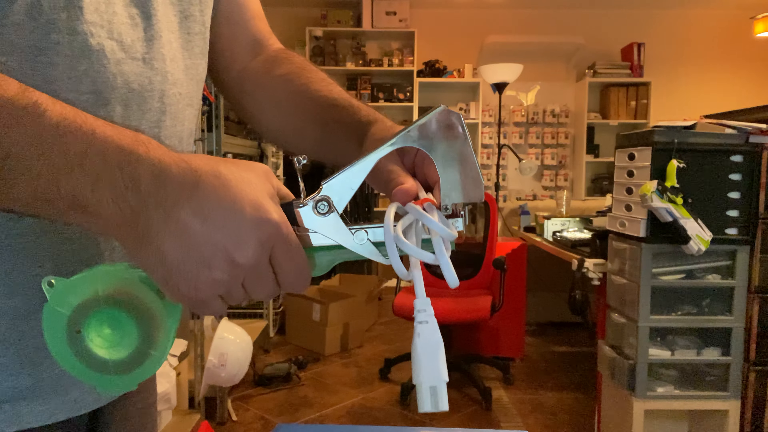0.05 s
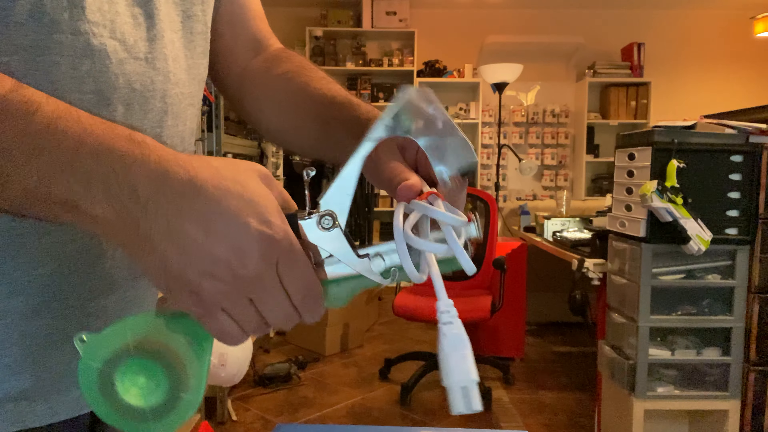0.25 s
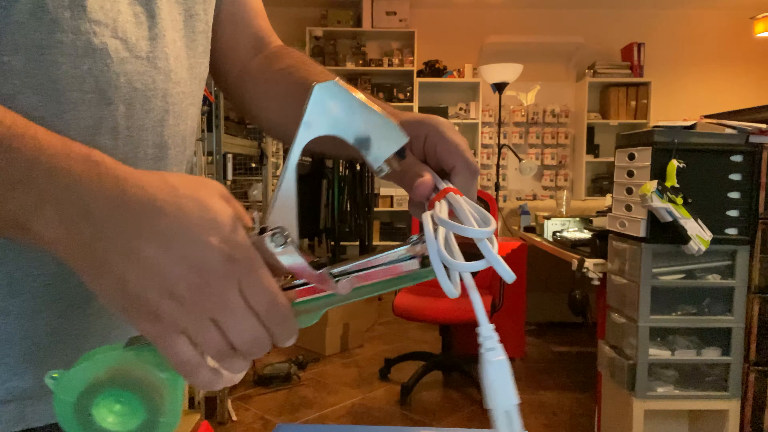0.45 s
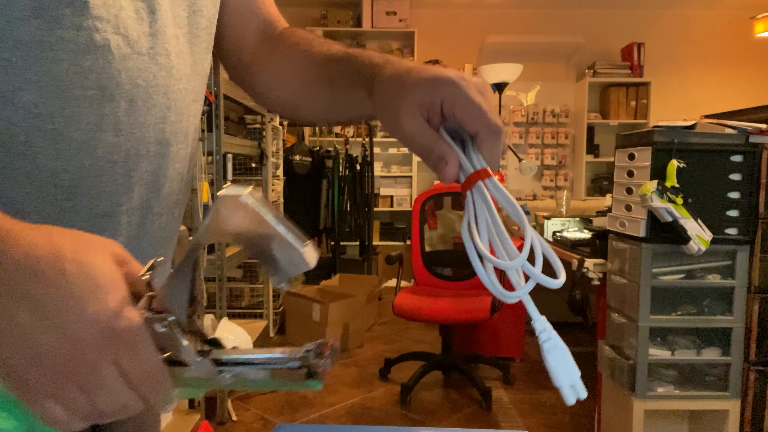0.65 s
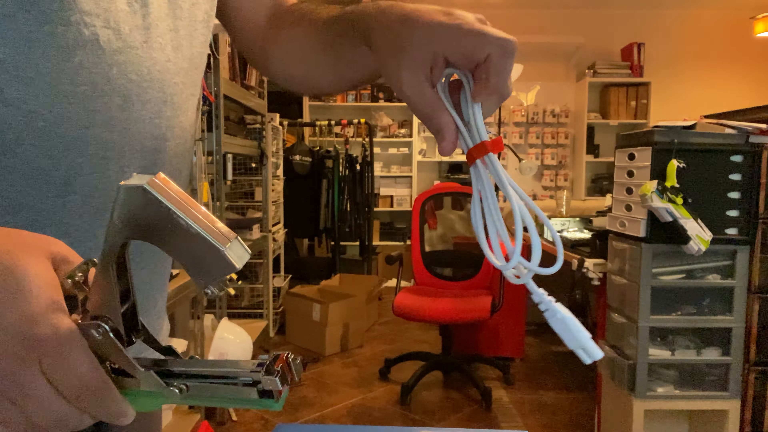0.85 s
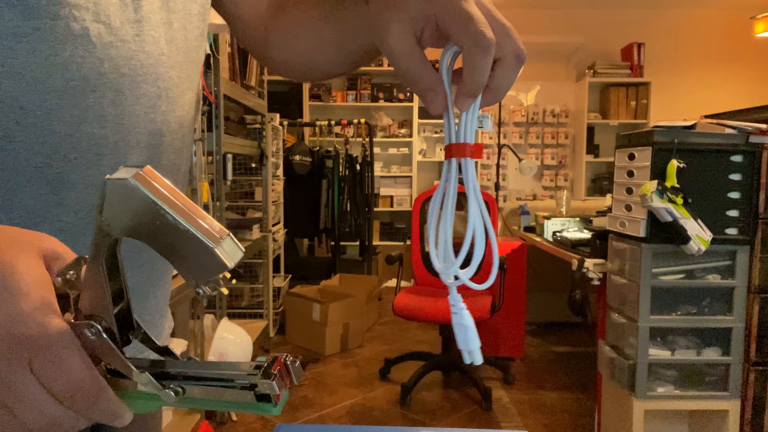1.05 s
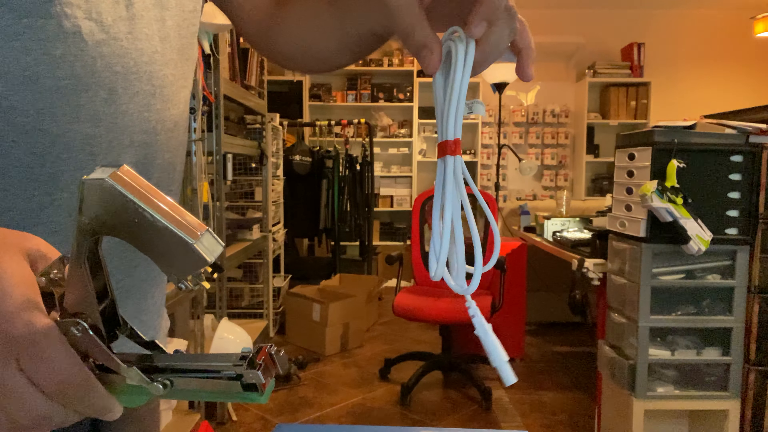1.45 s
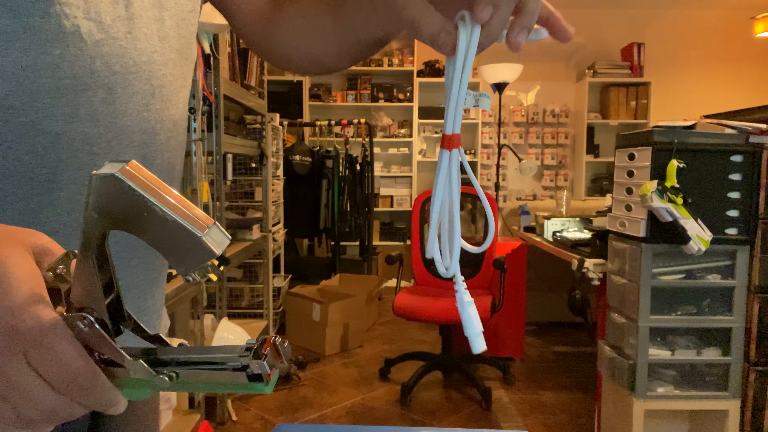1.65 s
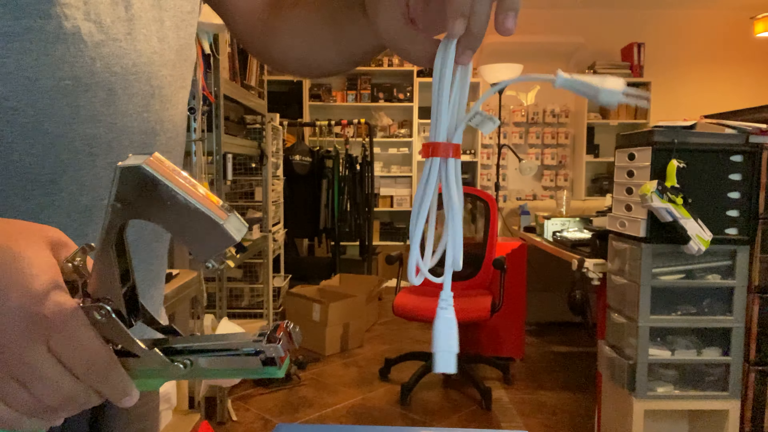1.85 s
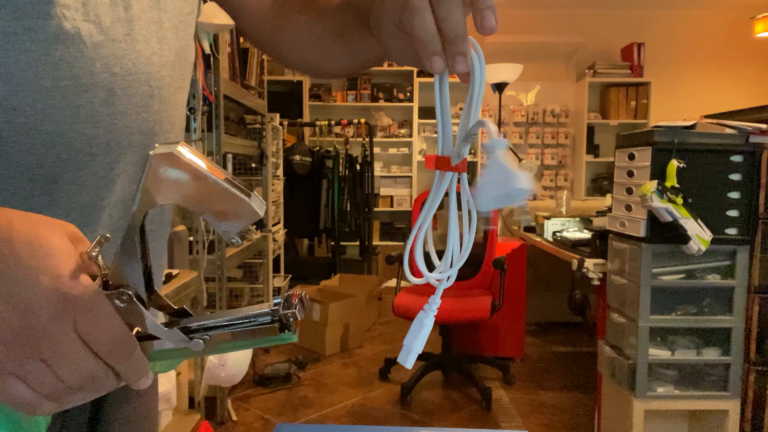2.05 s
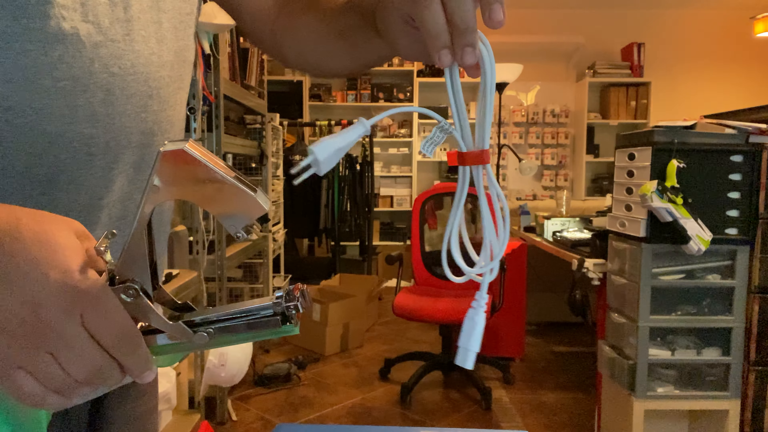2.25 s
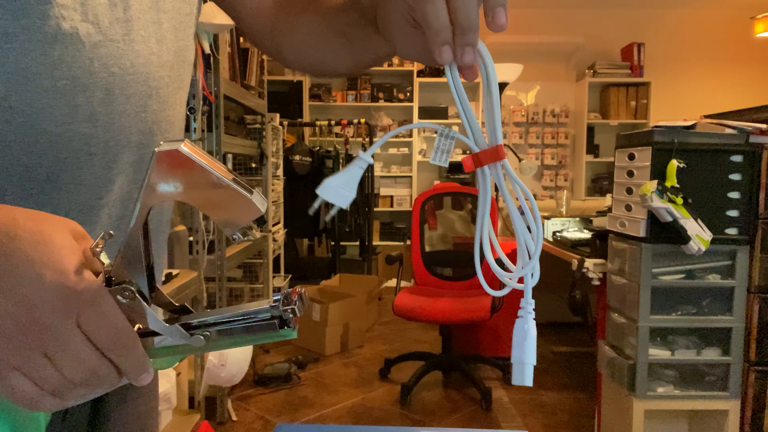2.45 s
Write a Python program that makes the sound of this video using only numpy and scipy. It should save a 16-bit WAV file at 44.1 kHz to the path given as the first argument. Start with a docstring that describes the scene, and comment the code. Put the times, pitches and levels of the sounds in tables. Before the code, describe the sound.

A handheld steel tying tool snaps shut close by, with a loud, sharp double clack at about 0.2 to 0.3 seconds, a brief metallic ring and a dull handle thud. Its loose jaw knocks softly from 0.5 to 0.8 seconds. From 1 to 2.2 seconds, a handled cable gives faint ticks and short hissy slides. A low ventilation hum continues throughout, in a workshop with short reverberation.

```python
"""Soft knocks over a low ventilation hum: a handheld steel tying tool is moved close to the microphone.
Squeezed shut on a coiled cable, it snaps twice, staple then tape cutter; each impact excites the
damped modes of its sheet steel, jaw and plastic handle, and the handles bump against their stop.
The loose jaw knocks as it springs open, then the cable ticks and slides with friction in the hand.
The cluttered workshop adds a short reverberation."""
import sys
import numpy as np
from scipy import signal
from scipy.fft import rfft, irfft, next_fast_len
from scipy.io import wavfile
from scipy.ndimage import map_coordinates

SR = 44100
rng = np.random.default_rng(int(sys.argv[2]) if len(sys.argv) > 2 else 0)


def store_wav(level_fs):
    """Save 16-bit WAV to argv[1]."""
    pcm = np.round(np.clip(np.atleast_2d(level_fs), -1, 1) * 32767)
    wavfile.write(sys.argv[1], SR, pcm.T.astype(np.int16))


N = 110250
ATTACK_S, BODY_ATTACK_S = 0.00038, 0.00055


def amp(db):
    """Amplitude ratio of a level in decibels."""
    return 10 ** (np.asarray(db) / 20)


def unit_rms(x):
    """Normalisation to unit mean power."""
    return x / np.sqrt(np.mean(x ** 2) + 1e-20)


def along(points, hz):
    """Interpolation of (frequency [Hz], value) points on a logarithmic frequency axis."""
    freqs, values = np.transpose(points)
    return np.interp(np.log(hz + 1), np.log(freqs + 1), values)


def filtered(x, response):
    """Linear filtering: the spectrum is multiplied by a frequency response."""
    n = x.shape[-1]
    size = next_fast_len(n + 8192)
    return irfft(rfft(x, size) * response(np.fft.rfftfreq(size, 1 / SR)), size)[..., :n]


def high_pass(x, hz):
    """Second-order attenuation below a cutoff."""
    return signal.sosfilt(signal.butter(2, min(hz, SR / 3), "high", fs=SR, output="sos"), x)


def wobble(knots_per_s):
    """Smooth random modulation."""
    return map_coordinates(rng.standard_normal(N // 20), [np.arange(N) * knots_per_s / SR], mode="wrap")


def add(track, start_s, sound):
    """Superposition of a sound on the track."""
    i = max(0, round(start_s * SR))
    track[:, i:i + sound.shape[-1]] += sound[..., :N - i]


def noise(spectrum, coherence, n):
    """Partial coherence: independent noises, added and subtracted, make a stereo pair."""
    def response(hz):
        angle = np.arccos(np.clip(along(coherence, hz), -1, 1)) / 2
        return amp(along(spectrum, hz)) * [np.cos(angle), np.sin(angle)]
    mid, side = filtered(rng.standard_normal((2, n)), response)
    return unit_rms(np.array([mid + side, mid - side]))


def mode(hz, t60, attack_s):
    """Damped oscillation: a struck resonance falls 60 dB in t60 seconds."""
    t = np.arange(SR // 4) / SR
    return np.sin(2 * np.pi * hz * t) * np.exp(-np.log(1000) * t / t60) * (1 - np.exp(-t / attack_s))


# Left port's excess for a near source (frequency [Hz], level [dB])
NEAR_PAN = [(100, 1), (350, 2.5), (750, 6), (1500, 3), (3000, 0.3), (5500, -2.5), (13000, 0)]
# Left port's lead for a near source (frequency [Hz], phase [rad])
NEAR_LEAD = [(150, .05), (350, 1), (750, 1.6), (1500, 2.9), (3000, 2.3), (4500, 1.4), (6200, 0)]
def ports(hz):
    """Level and phase differences: a near source reaches the two microphone ports unequally."""
    half = np.array([[.5], [-.5]])
    return amp(half * along(NEAR_PAN, hz)) * np.exp(1j * half * along(NEAR_LEAD, hz))


# Near sound at the two ports (frequency [Hz], coherence [0 to 1])
NEAR_COHERENCE = [(150, .7), (700, .9), (1500, .7), (3000, .65), (5500, .5), (8000, .85), (10000, .96)]
def contact(spectrum, t60, attack_s):
    """Modal overlap: the dense resonances of one impact merge into decaying noise."""
    t = np.arange(SR // 4) / SR
    envelope = amp(-60 * t / t60) * (1 - np.exp(-t / attack_s))
    burst = filtered(noise(spectrum, NEAR_COHERENCE, len(t)), ports) * envelope
    return unit_rms(burst) * np.sqrt(np.mean(envelope ** 2))


# Ventilation noise (frequency [Hz], relative level [dB])
RUMBLE_SPECTRUM = [(15, -34), (25, -13), (64, -5), (161, -6.5), (384, -19), (641, -16), (775, -21.5),
                   (936, -18.5), (1100, -26), (1190, -21.5), (1790, -31), (2690, -29.5), (3820, -44),
                   (8360, -47.5), (13500, -50), (16000, -58)]
# That noise at the two ports (frequency [Hz], coherence [0 to 1])
RUMBLE_COHERENCE = [(60, 0.9), (200, 0.75), (400, .45), (900, .05), (6000, 0.1), (10000, .9)]
# Hum tones (frequency [Hz], level [dB])
HUM_TONES = [(64.6, -69.5), (157, -72.5), (274.5, -73.5), (328.4, -81)]
def ventilation(rumble_db=-59.5):
    """Line and continuous spectra: tones wavering in phase stand over a broadband rumble."""
    t = np.arange(N) / SR
    hum = sum(amp(db) * np.sqrt(2) * np.sin(2 * np.pi * hz * t + 0.63 * wobble(18))
              for hz, db in HUM_TONES)
    return amp(rumble_db) * noise(RUMBLE_SPECTRUM, RUMBLE_COHERENCE, N) + hum


# Knocks and scuffs of the jaw; the first row is a blow struck just before, still dying away as the scene opens
# (time [s], level [dB], T60 [s])
KNOCKS = [(0.0, -44.5, 0.16), (0.132, -54.5, 0.2), (0.476, -43, 0.085), (0.631, -47, 0.061),
          (0.644, -46.5, 0.066), (0.675, -45.5, 0.031), (0.76, -58, 0.18), (0.803, -55.5, 0.047)]
# One knock (frequency [Hz], relative level [dB])
KNOCK_SPECTRUM = [(100, -19), (400, -12), (680, -0.5), (1050, -9), (1370, 4.5), (1700, -6), (2400, -4.5),
                  (3500, -17), (7000, -30), (15000, -45)]
def loose_jaw():
    """Soft impact: the loose jaw knocks with a blunt onset and little treble."""
    out = np.zeros((2, N))
    for start, db, t60 in KNOCKS:
        add(out, start, amp(db) * contact(KNOCK_SPECTRUM, t60, attack_s=0.0022))
    return out


# Ticks of cable and tape (time [s], level [dB], T60 [s], low cutoff [Hz])
TICKS = [(0.083, -66, 0.035, 8000), (0.133, -61, 0.04, 2000), (0.52, -61.5, 0.04, 3960),
         (1.0985, -52, 0.035, 1400), (1.104, -46, 0.017, 1610), (1.163, -51.5, 0.015, 7100),
         (1.366, -58, 0.032, 2507), (1.597, -67.5, 0.07, 5000)]
# One tick (frequency [Hz], relative level [dB])
TICK_SPECTRUM = [(500, -11), (1500, 2.5), (3300, -2), (5000, -9), (8200, 1), (10000, -6), (13000, -4),
                 (16000, -13)]
def cable_ticks():
    """Light impact: brief contacts sound only in the treble, with a faint ring."""
    out = np.zeros((2, N))
    ring = amp(-20) * mode(hz=2630, t60=.12, attack_s=ATTACK_S)
    for start, db, t60, cutoff_hz in TICKS:
        tick = contact(TICK_SPECTRUM, t60, ATTACK_S) + ring
        add(out, start, amp(db) * high_pass(tick, cutoff_hz))
    return out


# Cracks of the staple and the tape cutter (frequency [Hz], relative level [dB])
STAPLE_SPECTRUM = [(100, -50), (400, -29), (1200, -12.5), (2200, -1.5), (3000, -3.5), (3900, 6.5),
                   (5000, -4.5), (6500, -1.5), (9000, -7), (11200, -7.5), (12300, 2.5), (13500, -9),
                   (16000, -13.5)]
CUTTER_SPECTRUM = [(300, -29.5), (1200, -9), (2400, 0.5), (3500, -0.5), (5500, -3), (7500, -0.5),
                   (9000, -7), (12500, -6), (16000, -13)]
def crack(cutter_share, t60):
    """Hard impact: a sudden force has a broad spectrum, here a blend of staple and cutter."""
    hz = np.geomspace(200, 16000, num=128)
    db = (1 - cutter_share) * along(STAPLE_SPECTRUM, hz) + cutter_share * along(CUTTER_SPECTRUM, hz)
    return high_pass(contact(np.transpose([hz, db]), t60, ATTACK_S), hz=600)


# Modes of the plastic handle (frequency [Hz], level [dB], T60 [s])
HANDLE_MODES = [(160, -19, .09), (238, -18.5, 0.089), (429, -11, .025), (580, -4, .025), (713, -0.5, .028),
                (1090, -2, 0.032)]
def handle_thud():
    """Heavy damping: the plastic's low modes die quickly into a dull thud."""
    modes = sum(amp(db) * mode(hz, t60, BODY_ATTACK_S) for hz, db, t60 in HANDLE_MODES)
    return high_pass(filtered(modes, ports), hz=175)


# Modes of the steel jaw (frequency [Hz], level from staple [dB], level from cutter [dB], T60 [s])
JAW_MODES = [(646, -17, -14, .14), (720, -14, -5, .15), (1048, -14, -5, .16), (1125, -11, -2, .14),
             (1220, -6, -3, .11), (1345, -7, -5, .19), (1470, 0, -7, .09), (1530, -5, -3, .14),
             (1997, -12, -6, .15), (2438, -10, 4, .12), (2900, -3, -9, .07), (3988, 1, -8, .08),
             (5565, -16, -8, .11), (6262, -8, -13, .11), (6545, -12, -14, .12), (7148, -14, -12, .15),
             (12410, -4, -14, .07)]
def jaw_ring(cutter_share):
    """Modal excitation: staple and cutter drive the same modes in different measure."""
    t = np.arange(SR // 4) / SR
    hz, staple_db, cutter_db, t60 = np.transpose(JAW_MODES)
    strength = amp((1 - cutter_share) * staple_db + cutter_share * cutter_db)
    strike = strength * np.exp(2j * np.pi * rng.random(len(hz)))
    modes = np.exp((2j * np.pi * hz - np.log(1000) / t60)[:, None] * t)
    return ((ports(hz) * strike) @ modes).real * (1 - np.exp(-t / ATTACK_S))


# Impacts in the tool
# (time [s], crack level [dB], crack T60 [s], cutter share [0 to 1], steel level [dB], thud level [dB])
BLOWS = [(0.186, -39, 0.02, 0, -56, -76), (0.1966, -36, 0.11, 0.07, -45, -62),
         (0.2046, -1.5, 0.0081, 0.06, -25, -44), (0.2057, -15.5, .022, 0.03, -21.5, -42),
         (0.209, -12.5, .026, 0.15, -16.5, -39), (0.235, -42, 0.05, 0.3, -45, -34.5),
         (0.2553, -23, 0.05, 0.8, -44, -48), (0.2598, -10, .03, 0.88, -16.5, -24.5),
         (0.2648, -16, .036, 0.73, -16.5, -32), (0.2714, -32, .035, 0.7, -16, -27),
         (0.2974, -27.5, 0.044, 0.6, -32, -20.5), (0.312, -34.5, 0.028, 1, -34, -38.5)]
# Clank of the sheet steel (frequency [Hz], relative level [dB])
CLANK_SPECTRUM = [(200, -36), (600, -21), (950, -20.5), (1120, -5), (1480, 1), (1800, -7), (2500, -9.5),
                  (4000, -22.5), (9000, -42.5)]
def tool_snaps(ring_db=-14.5):
    """Impulse excitation: each blow cracks, sets handle and steel vibrating and sounds the room."""
    out = np.zeros((2, N))
    thud = handle_thud()
    for start, crack_db, t60, cutter_share, steel_db, thud_db in BLOWS:
        blow = amp(crack_db) * crack(cutter_share, t60) + amp(thud_db) * thud
        clank = contact(CLANK_SPECTRUM, t60=0.039, attack_s=BODY_ATTACK_S)
        steel = amp(steel_db) * (clank + amp(ring_db) * jaw_ring(cutter_share))
        add(out, start, workshop(blow + steel))
    return out


# The handles hit their stop (time [s], level [dB])
BUMPS = [(0.276, -43), (0.289, -44), (0.325, -49)]
def handle_bumps():
    """Free vibration: each hit on the stop excites one low mode."""
    out = np.zeros((2, N))
    for start, db in BUMPS:
        add(out, start, amp(db) * mode(hz=82.5, t60=.12, attack_s=.008))
    return out


# Slides of the cable
# (centre time [s], half width [s], level [dB], low edge [Hz], slope above the edge [dB/octave])
SLIDES = [(0.99, .045, -73.5, 10040, -1), (1.023, .018, -73, 2804, -7), (1.377, 0.018, -67.5, 7400, -15),
          (1.745, .025, -80, 7000, -2), (2.138, 0.014, -68, 7000, 2), (2.167, .016, -64, 6400, 3)]
def cable_slides(roughness_db=2.5):
    """Sliding friction: cable drawn through the fingers gives short swells of grainy hiss."""
    out, t = np.zeros((2, N)), np.arange(N) / SR
    grip = unit_rms(amp(roughness_db * wobble(210)))
    for centre, half_width, db, edge_hz, slope in SLIDES:
        spectrum = [(edge_hz / 2, -30), (edge_hz, 0), (edge_hz * 4, 2 * slope)]
        swell = np.exp(-.5 * ((t - centre) / half_width) ** 2)
        out += amp(db) * swell * grip * noise(spectrum, NEAR_COHERENCE, N)
    return out


# Reverberation at the two ports (frequency [Hz], coherence [-1 to 1])
ROOM_COHERENCE = [(160, .92), (350, .5), (750, .2), (1500, -.35), (3000, -.1), (5500, .1), (8000, .65),
                  (10000, .92)]
# Reverberation time (frequency [Hz], T60 [s])
ROOM_T60 = [(100, 0.32), (650, 0.26), (1400, 0.32), (4000, 0.38), (8000, .37), (14000, 0.32)]
# Colour of the reverberation (frequency [Hz], gain [dB])
ROOM_COLOUR = [(100, 0.5), (700, -0.5), (1400, 0), (3000, -1.5), (7000, -5), (13000, -5.5)]
def workshop(direct, tail_db=-6, delay_s=0.0021, build_s=0.0017):
    """Reverberation: a diffuse tail follows the direct sound, each band decaying at its own rate."""
    n = SR // 2
    white = noise([(100, 0.0014), (10000, 0.00045)], ROOM_COHERENCE, n)
    hz, t, bands = signal.stft(white, SR, nperseg=256)
    decay = np.exp(-np.log(1000) * t / along(ROOM_T60, hz)[:, None])
    tail = signal.istft(bands * decay, SR, nperseg=256)[1][:, :n]
    tail *= 1 - np.exp(-np.maximum(np.arange(n) / SR - delay_s, 0) / build_s)
    tail = filtered(tail / np.linalg.norm(tail[0]), lambda hz: amp(along(ROOM_COLOUR, hz)))
    reverberation = signal.fftconvolve(direct[:1], tail, axes=1)
    return np.pad(direct, ((0, 0), (0, n - 1))) + amp(tail_db) * reverberation


def scene():
    """Superposition: the pressures of tool, cable and ventilation add."""
    tool = tool_snaps() + handle_bumps()
    handling = cable_slides() + cable_ticks() + loose_jaw()
    return tool + workshop(handling)[:, :N] + ventilation()


# Left port relative to right, for every sound (frequency [Hz], phase [rad])
PORT_PHASE = [(6800, 0), (8400, -1.4), (10050, -3.14), (13000, -6.28), (15800, -9.3)]
def record(dry, ceiling=.85, top_hz=15750):
    """Phase shift and saturation: the ports differ in treble phase; peaks and bandwidth are limited."""
    shifted = filtered(dry, lambda hz: np.exp(1j * np.array([[.5], [-.5]]) * along(PORT_PHASE, hz)))
    rounded = shifted / (1 + (shifted / ceiling) ** 6) ** (1 / 6)
    return filtered(rounded, lambda hz: 1 / np.sqrt(1 + (hz / top_hz) ** 160))


dry = scene()
out = record(dry)
store_wav(out)
```